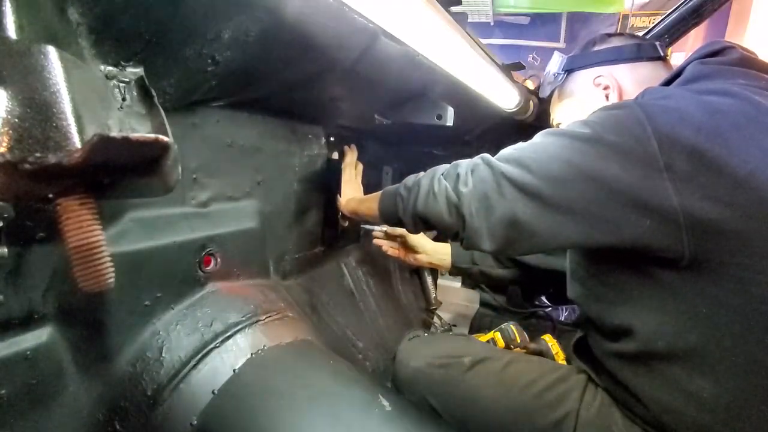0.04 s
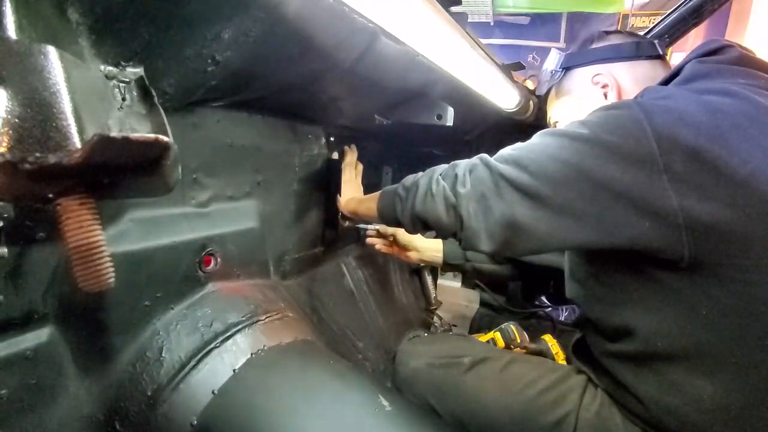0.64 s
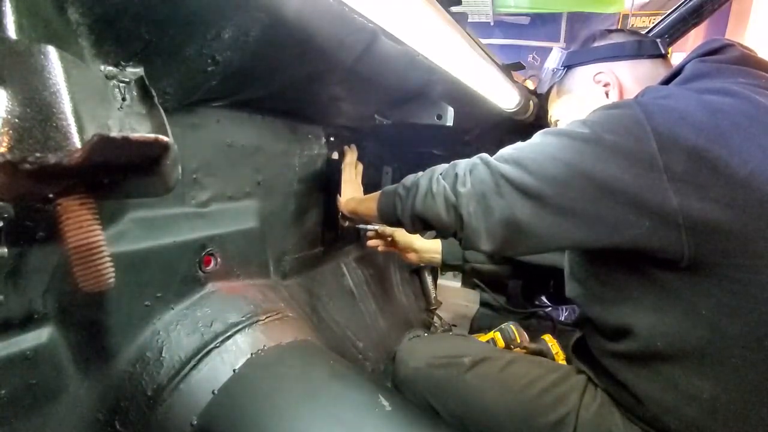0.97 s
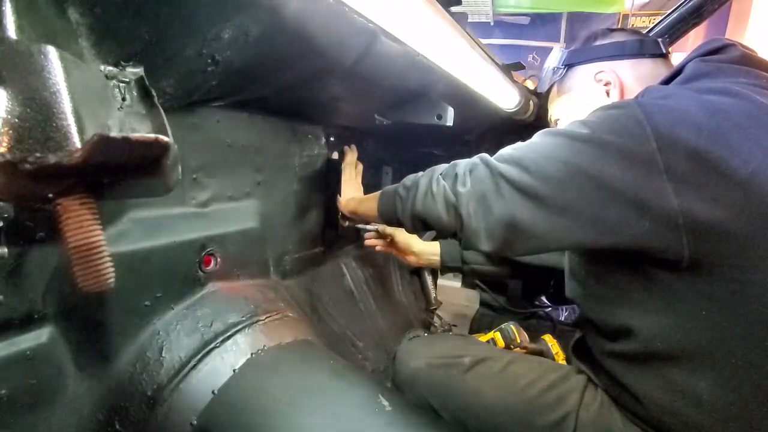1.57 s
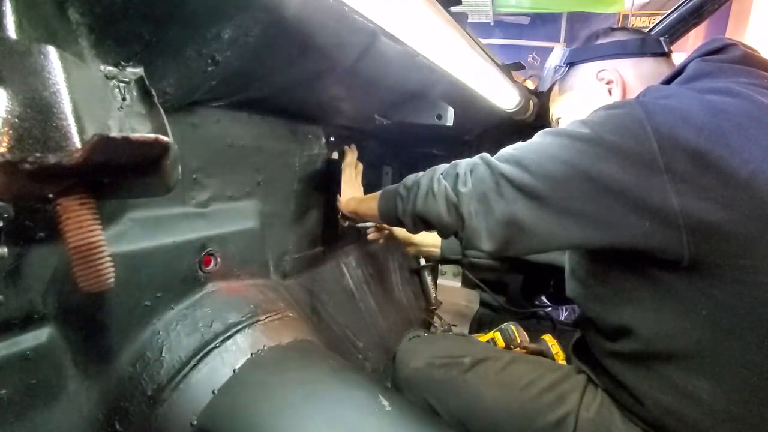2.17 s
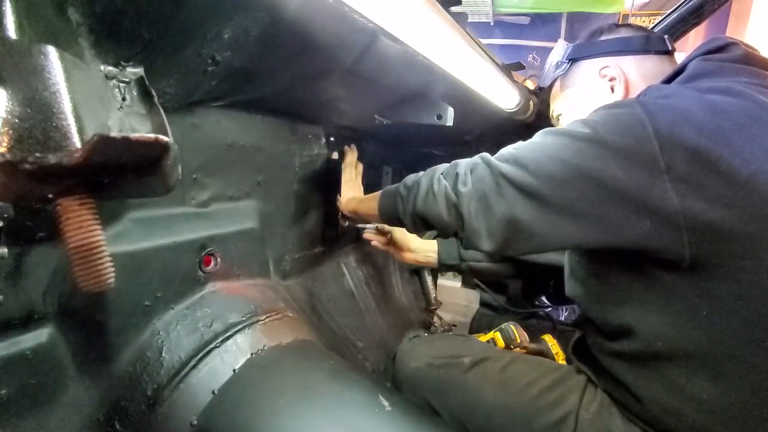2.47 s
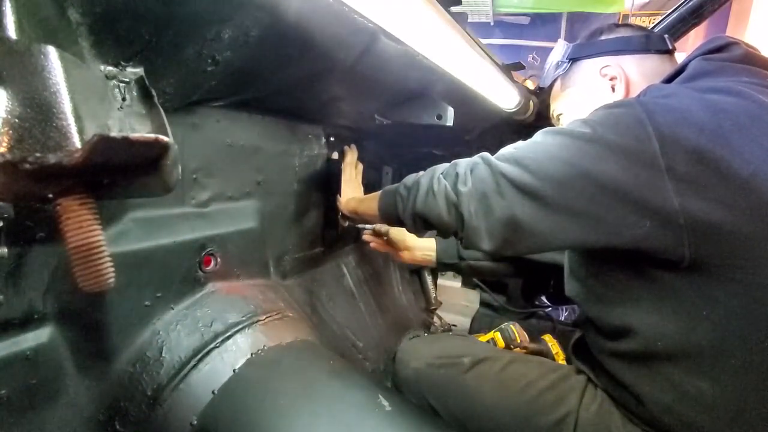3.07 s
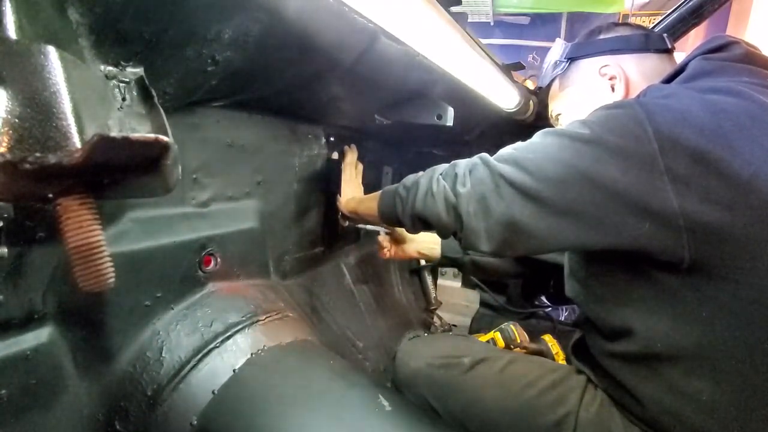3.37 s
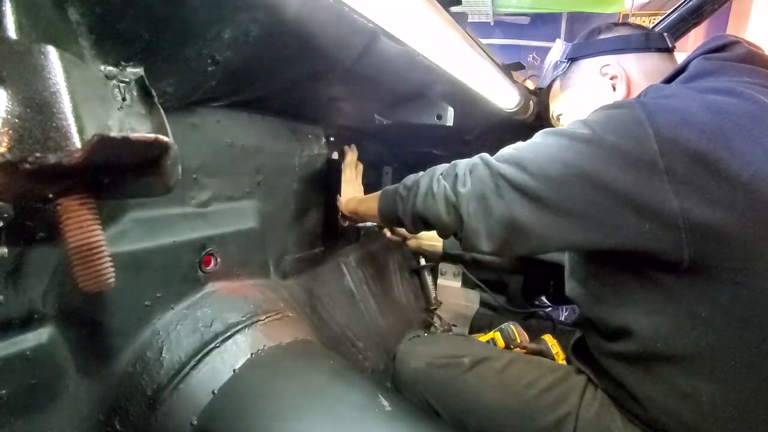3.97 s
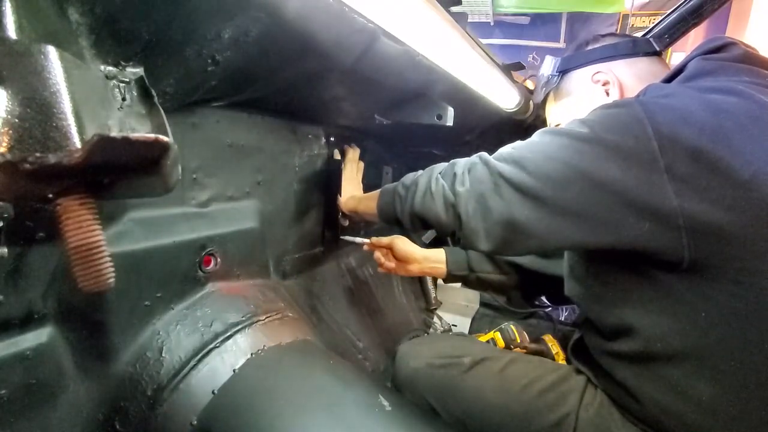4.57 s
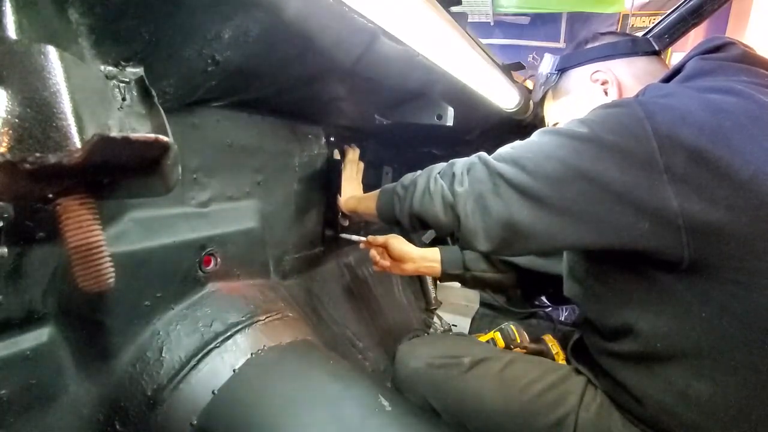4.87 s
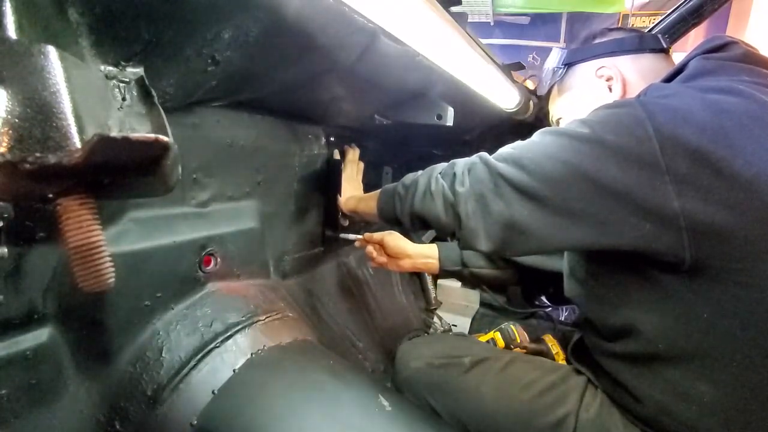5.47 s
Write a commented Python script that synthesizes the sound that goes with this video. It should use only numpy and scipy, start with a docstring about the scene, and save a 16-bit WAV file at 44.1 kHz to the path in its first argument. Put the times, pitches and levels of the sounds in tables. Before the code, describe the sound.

A fan hums steadily while a hand tool ticks and scrapes on a steel bracket that knocks against a car's floor.

```python
"""A workshop fan drones from start to end, its hum booming in a car body over a rush of air.
From about 0.6 s a hand tool marks a steel bracket held against the car's bare floor pan:
the tool ticks and scrapes on the bracket, and the bracket knocks the panel.
The hard cabin smears each contact. The loudest ones come early, up to about 1.1 s;
scattered ones follow, growing lighter towards the end."""
import sys
import numpy as np
from scipy import signal
from scipy.fft import rfft, irfft, next_fast_len
from scipy.io import wavfile

SR = 44100
rng = np.random.default_rng(int(sys.argv[2]) if len(sys.argv) > 2 else 0)


def dump(signal):
    """Clip the signal to [-1, 1] and save it as 16-bit WAV at the path in sys.argv[1]."""
    limited = np.clip(np.atleast_2d(signal).T, -1, 1)
    pcm = np.round(limited * 32767).astype(np.int16)
    wavfile.write(sys.argv[1], SR, pcm)


N = 243431
TIME = np.arange(N) / SR
CONTACT_SAMPLES = 18432  # room for one contact to ring out

# how much the two ears differ in the cabin: (frequency [Hz], difference against shared sound [dB])
STEREO_WIDTH = [(60, -89.5), (120, -17), (230, -6.5), (500, -6.5), (800, -1), (1300, 1.5), (4000, -0.5),
                (12000, 0)]
# tone of the tool's contacts with the steel: (frequency [Hz], level [dB])
STEEL_TONE = [(60, -65), (400, -21.5), (1000, 7), (1800, 9), (3300, -2.5), (4700, -6), (6500, -2.5),
              (7900, -3), (8800, -14.5), (10200, -11), (11800, -10), (15000, -18.5), (17000, -44)]


def undb(db):
    """Turn decibels into a number to multiply by."""
    return 10 ** (np.asarray(db) / 20)


def unit(x):
    """Scale a signal to an average strength (rms) of 1."""
    return x / np.sqrt(np.mean(x ** 2))


def freqs(size):
    """The frequencies in the spectrum of `size` samples, kept above zero."""
    return np.maximum(np.arange(size // 2 + 1) * SR / size, 1)


def along(points, hz):
    """Read between (frequency, value) points, with octaves evenly spaced."""
    f, value = np.transpose(points)
    return np.interp(np.log(hz), np.log(f), value)


def hump(hz, centre_hz, octaves):
    """A broad peak: 1 at the centre, one half at `octaves` to either side."""
    return 1 / (1 + (np.log2(hz / centre_hz) / octaves) ** 2)


def pan(db):
    """Gains that make the left ear `db` louder than the right."""
    return undb(np.array([[db], [-db]]) / 2)


def fade(t, t60):
    """Die away by 60 dB every `t60` seconds."""
    return np.exp(-np.log(1000) * t / t60)


def add(out, sound, start_s):
    """Mix a sound in at a given time."""
    start = int(start_s * SR)
    part = sound[:, :N - start]
    out[:, start:start + part.shape[1]] += part


def cabin_noise(spectrum, size):
    """Stereo noise of a given tone: the same in both ears in the bass, spread out higher up."""
    padded = next_fast_len(size, real=True)
    f = freqs(padded)
    mid, side = rfft(rng.standard_normal((2, padded)))
    side = side * undb(along(STEREO_WIDTH, f))
    ears = np.array([mid + side, mid - side]) * np.interp(f, freqs(size), spectrum)
    return unit(irfft(ears, padded)[:, :size])


def waver(rate_hz):
    """A smooth random wobble, mostly slower than the given rate."""
    return unit(cabin_noise(1 / (1 + (freqs(N) / rate_hz) ** 4), N)[0])


def ripple(spacing_hz=110):
    """Random peaks and dips in the tone, from the many close notes that one spot sets ringing."""
    return np.interp(freqs(CONTACT_SAMPLES) / spacing_hz, np.arange(1024), rng.standard_normal(1024))


def ring(modes, drive, scatter_db):
    """Struck metal rings at its own notes (modes), whose strengths vary with the spot hit."""
    hz, db, t60 = np.transpose(modes)[:, :, None]
    t = np.arange(CONTACT_SAMPLES) / SR
    strength, detune, lag = rng.standard_normal((3, len(hz), 1))
    gain = undb(db + scatter_db * strength) * np.reshape(drive, (-1, 1))
    phase = 2 * np.pi * (hz * (1 + .002 * detune) * t + rng.random(hz.shape))
    # higher notes reach the two ears out of step
    apart = np.arctan(undb(along(STEREO_WIDTH, hz))) * np.sign(lag)
    decay = gain * fade(t, t60) / np.sqrt(np.sum(gain ** 2) / 2)
    return np.array([np.sum(decay * np.sin(phase + ear * apart), axis=0) for ear in (-1, 1)])


def air(level_db=-55, ease_db_per_s=.5, pan_db=2.14):
    """Moving air rushes with a few faint whistles and slowly eases off."""
    # tone of the rush: (frequency [Hz], level [dB])
    rush_tone = [(100, -11), (180, 2), (300, -6.5), (400, -8.5), (680, -16.5), (920, -19.5), (1400, -18.5),
                 (2000, -21.5), (2700, -33), (5000, -41), (7900, -37), (8800, -52.5), (12000, -43.5),
                 (16000, -45)]
    # narrow whistles: (frequency [Hz], width [Hz], height above the rush [dB])
    whistles = [(484.4, 2.2, 13.5), (704, 52, 10), (4860, 44, 7), (5960, 110, 12)]
    f = freqs(N)
    whistle_db = sum(peak / (1 + (2 * (f - hz) / width) ** 2) for hz, width, peak in whistles)
    rush = cabin_noise(undb(along(rush_tone, f) + whistle_db), N)
    return pan(pan_db) * rush * undb(level_db - ease_db_per_s * TIME)


def fan(hum_hz=113.45, hum_db=-3.0, drift_share=0.01992, drift_hz=2.66, overtone_db=-37,
        flutter_db=-41, flutter_hz=7.54, rumble_db=-36.5, ease_db_per_s=.5, pan_db=1.9):
    """The fan's hum swells and flutters in churning air, over a rumble that booms in the car body."""
    # slow swells of the hum: (time [s], level [dB])
    swells = [(0.0, -42), (0.18, -34), (0.3, -41.5), (0.42, -27.5), (0.87, -38), (1.02, -25), (1.41, -50),
              (1.59, -24), (1.71, -57), (1.89, -25), (1.98, -37), (2.97, -33), (3.09, -21), (3.3, -35.5),
              (4.41, -29), (4.71, -49.5), (5.16, -27.5), (5.51, -38.5)]
    # tone of the rumble: (frequency [Hz], level [dB])
    rumble_tone = [(8, -69), (22, -41.5), (33, -19.5), (54, -4.5), (72, -3), (93, 5), (103, 0.5),
                   (118, -1.5), (132, -5), (153, -20), (220, -35), (500, -120)]
    pitch_hz = hum_hz * (1 + drift_share * waver(drift_hz))
    phase = 2 * np.pi * np.cumsum(pitch_hz) / SR
    swell_db = np.interp(TIME, *np.transpose(swells))
    hum = unit(np.sin(phase) + undb(overtone_db) * np.sin(2 * phase)) * undb(swell_db + hum_db)
    flutter = waver(flutter_hz) * np.sin(phase) + waver(flutter_hz) * np.cos(phase)
    rumble = cabin_noise(undb(along(rumble_tone, freqs(N))), N)
    rumble *= undb(rumble_db - ease_db_per_s * TIME)
    return pan(pan_db) * (hum + flutter * undb(flutter_db) + rumble)


def scrapes(slips_per_s=1200, grit_db=3, octaves=0.58, slip_t60=0.083, pan_db=3):
    """The tool's tip drags over the steel in many tiny slips, each ringing briefly."""
    # strokes of the tool: (time [s], length [s], level [dB], centre frequency [Hz])
    strokes = [(0.801, 0.17, -69.5, 7800), (1.171, 0.12, -66, 3270), (1.997, 0.076, -56, 900),
               (2.002, 0.045, -68, 3770), (2.803, 0.09, -70, 6000), (3.842, 0.18, -71, 3380),
               (4.086, .12, -66, 3040), (4.246, 0.16, -79, 6960)]
    size = CONTACT_SAMPLES
    out, t, f = np.zeros((2, N)), np.arange(size) / SR, freqs(size)
    for start_s, length_s, db, centre_hz in strokes:
        slipping = rng.random(size) < slips_per_s / SR
        slips = slipping * undb(grit_db * rng.standard_normal(size)) * rng.choice([-1, 1], size)
        tone = undb(along(STEEL_TONE, f)) * hump(f, centre_hz, octaves)
        slip_ring = cabin_noise(tone, size) * fade(t, slip_t60)
        scrape = unit(irfft(rfft(slips) * rfft(slip_ring)))  # gives every slip that ring
        pressure = np.sin(np.pi * np.minimum(t / length_s, 1))
        add(out, scrape * pressure * undb(db), start_s)
    return out * pan(pan_db)


def knocks(echo_db=-3, ring_db=-4, cabin_t60=.24, rise_cycles=10, pan_db=-0.4):
    """The bracket bumps the floor panel; deeper blows wake its lower notes, which swell and linger."""
    # dull blows: (time [s], level [dB], centre frequency [Hz], spread to each side [octaves])
    blows = [(0.593, -51.5, 650, 1.1), (0.708, -51.5, 700, 1.8), (0.762, -44.5, 1630, 0.52),
             (0.777, -36, 1000, 1.3), (0.793, -33.5, 502, 0.21), (0.85, -42, 1140, 0.18),
             (0.857, -35, 690, 1.3), (0.924, -44.5, 650, 0.83), (1.099, -32.5, 268, 0.55),
             (1.100, -32.5, 566, 0.79), (1.502, -46, 640, 0.54), (1.795, -46.5, 550, 1.2),
             (1.877, -42.5, 654, 1.4), (2.368, -43.5, 640, 1), (2.458, -46.5, 660, 0.92),
             (2.522, -46.5, 494, 2.3), (2.554, -40, 594, 1.07), (2.842, -44.5, 234, 0.79),
             (3.519, -44.5, 636, 0.69), (3.556, -41.5, 644, 0.53), (3.761, -50, 587, 2),
             (4.141, -46, 560, 0.45), (4.242, -53.5, 545, 0.86), (4.61, -53.5, 423, 0.25),
             (5.279, -44, 497, 0.6), (5.492, -50.5, 800, 1.5)]
    # notes of the panel with the bracket on it: (frequency [Hz], level [dB], time to fade 60 dB [s])
    panel_modes = [(171, -7.5, 0.36), (231.7, 5.5, 0.5), (287.5, -2.5, 0.65), (305.2, 1, 0.55),
                   (397, -19, 0.23), (491, 0.5, 0.24), (518.2, -6, 0.6), (557, -6, 0.57), (606, -7, 0.51),
                   (660, 1.5, .26), (750, -10.5, 0.074), (802, -1, 0.3), (1144, -6, 0.33),
                   (1550, -14, 0.14), (1700, -11, 0.21), (1620, -6.5, 0.19), (1810, -5.5, 0.21),
                   (1970, -8.5, 0.36), (1943, -8, 0.87), (2770, -11, 0.27)]
    # tone of a knock's echo: (frequency [Hz], level [dB])
    echo_tone = [(40, -31), (130, -22), (280, 7.5), (380, 1.5), (540, -0.5), (790, 0.5), (930, -17.5),
                 (1170, -3.5), (1400, -16), (1900, -12.5), (2400, -28.5), (5000, -16.5), (9000, -64)]
    out, t, f = np.zeros((2, N)), np.arange(CONTACT_SAMPLES) / SR, freqs(CONTACT_SAMPLES)
    for start_s, db, centre_hz, octaves in blows:
        # deep blows put more of their force into the panel's own ring and stay longer in the cabin
        depth = np.sqrt(550 / centre_hz)
        drive = hump(np.array(panel_modes)[:, 0], centre_hz, octaves)
        panel = ring(panel_modes, drive, scatter_db=0.5)
        tone = undb(along(echo_tone, f)) * hump(f, centre_hz, octaves)
        echo = cabin_noise(tone, CONTACT_SAMPLES) * fade(t, cabin_t60 * np.sqrt(depth))
        knock = undb(ring_db) * panel * depth + undb(echo_db) * echo / depth
        onset = 1 - fade(t, rise_cycles / centre_hz)
        add(out, knock * onset * undb(db), start_s)
    return out * pan(pan_db)


def ticks(level_db=-3, usual_db=-43.5, crack_db=2, crack_t60=0.0025, cabin_t60=0.14, rise_t60=.006,
          skid_s=.02, skid_db=-16, skid_t60=0.013, clink_db=-10, ripple_db=3, pan_db=4):
    """Steel hits steel: a short skid, a crack, the held bracket's clink and the cabin's quick echo."""
    # taps of the tool: (time [s], level [dB], boost or cut of one range [dB], its centre [Hz])
    taps = [(0.59, -60, 8, 6540), (0.661, -68, 2, 7000), (0.7602, -42, -5, 1700), (0.7767, -43, 1, 1800),
            (0.8494, -40, 8.5, 1600), (0.951, -57, 2.5, 7500), (1.0906, -48.5, 5, 2520),
            (1.098, -35.5, 14, 3830), (1.499, -49, -1, 2500), (1.865, -55, -8, 2500), (1.874, -46, 8, 4320),
            (2.554, -44, 1.5, 3500), (2.566, -58, -6, 2000), (2.84, -59, 2, 2010), (3.5177, -51, 1, 3500),
            (3.559, -47, -4.5, 2000), (3.756, -62, -11.5, 2500), (4.1388, -53, -11, 1800),
            (4.240, -53, -16, 2500), (5.104, -56.5, -19, 2000), (5.291, -65, -25, 2000)]
    # notes of the bracket: (frequency [Hz], level [dB], time to fade 60 dB [s])
    bracket_modes = [(2530, -14.5, 0.051), (2756, -1, 0.24), (3030, -10, 0.069), (3600, -17.5, 0.11),
                     (4300, -5, .12), (4680, -7, 0.09), (5750, -2, 0.11), (6240, -3, 0.074),
                     (6140, -9, 0.11), (6500, -3, 0.033), (7870, 1.5, 0.088), (8200, -13.5, 0.16),
                     (9100, -11, 0.11), (12000, -17.5, 0.11)]
    out, t, f = np.zeros((2, N)), np.arange(CONTACT_SAMPLES) / SR, freqs(CONTACT_SAMPLES)
    # the tip slides for a moment before it catches
    skid = undb(skid_db) * fade(abs(t - skid_s), skid_t60) * np.minimum(t / skid_s, 1)
    since_catch = np.maximum(t - skid_s, 0)
    onset = 1 - fade(since_catch, rise_t60)
    for start_s, db, boost_db, centre_hz in taps:
        # firm taps crack more, light ones clink more
        firm_db = db - usual_db
        crack = undb(crack_db + 1.3 * firm_db) * fade(since_catch, crack_t60)
        clink_gain = undb(clink_db - 0.47 * firm_db)
        envelope = onset * (fade(since_catch, cabin_t60) + crack) + skid
        # the spot and the hardness of the tap favour or mute one range
        colour_db = boost_db * hump(f, centre_hz, octaves=0.56)
        tone = undb(along(STEEL_TONE, f) + colour_db + ripple_db * ripple())
        burst = cabin_noise(tone, CONTACT_SAMPLES) * envelope
        drive = undb(np.interp(np.array(bracket_modes)[:, 0], f, colour_db))
        clink = ring(bracket_modes, drive, scatter_db=1.5) * (1 - fade(t, rise_t60))
        gain = undb(db + level_db) * pan(pan_db)
        add(out, burst * gain, start_s - skid_s)
        add(out, clink * clink_gain * gain, start_s)
    return out


def scene():
    """Hand work over the drone of the fan."""
    return fan() + air() + ticks() + knocks() + scrapes()


def record(dry, top_hz=15800):
    """Cut away the very highest treble."""
    return signal.sosfilt(signal.ellip(10, .2, 70, top_hz, fs=SR, output="sos"), dry)


dry = scene()
out = record(dry)
dump(out)
```